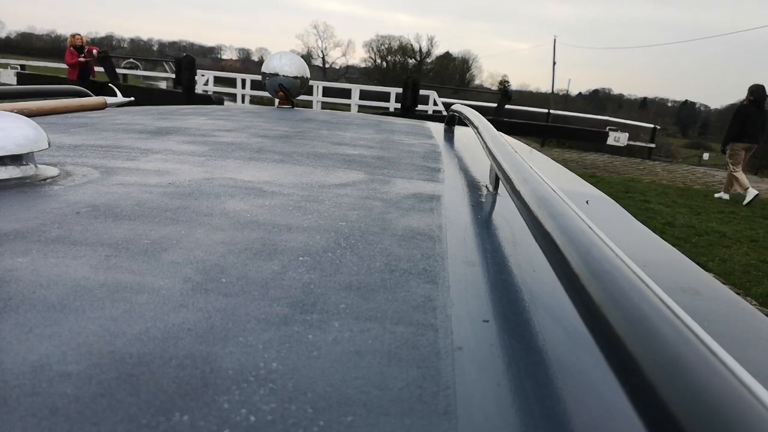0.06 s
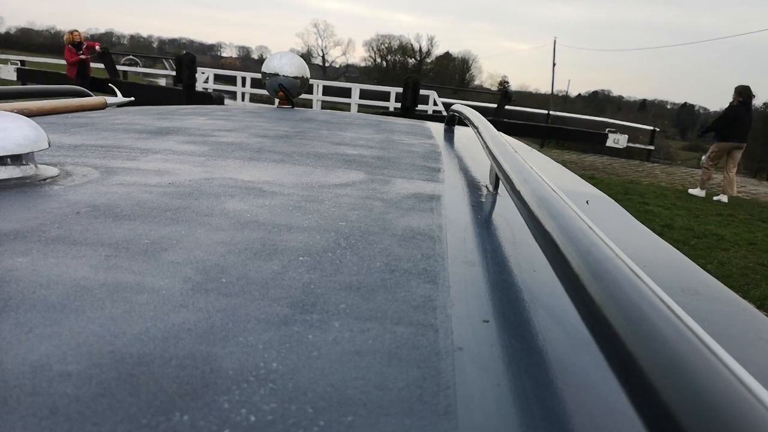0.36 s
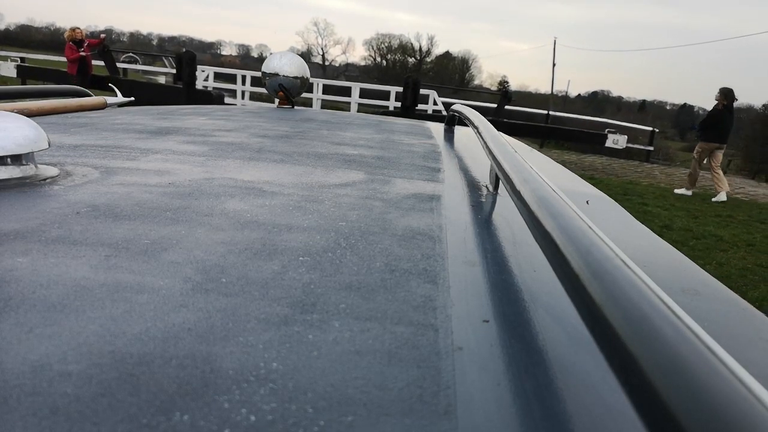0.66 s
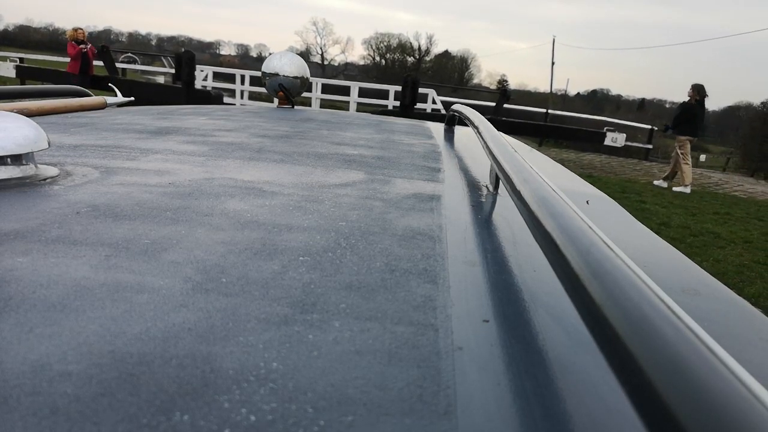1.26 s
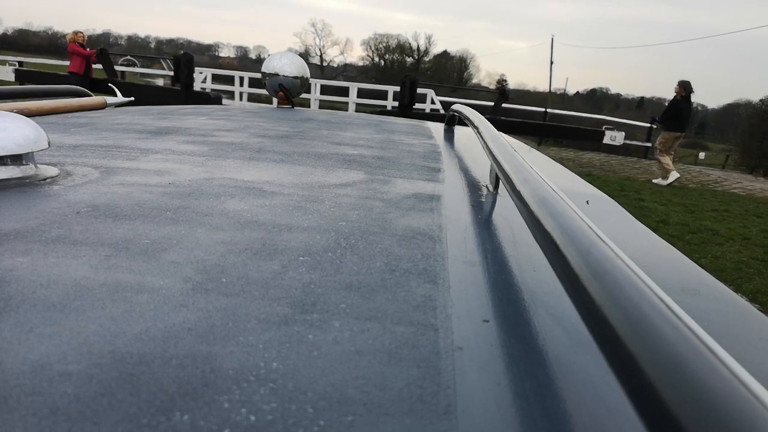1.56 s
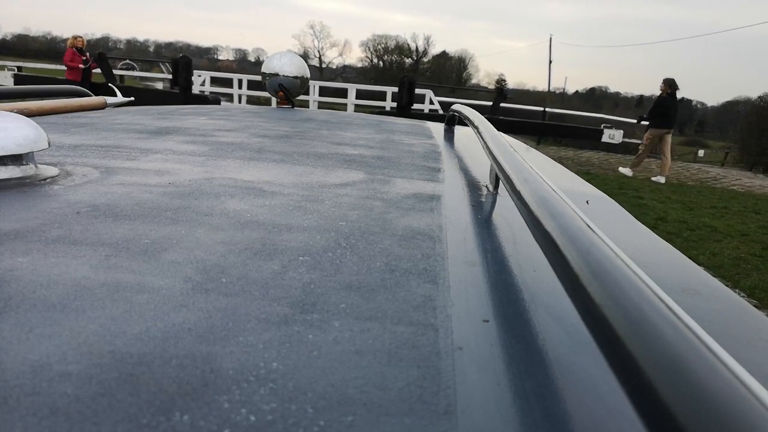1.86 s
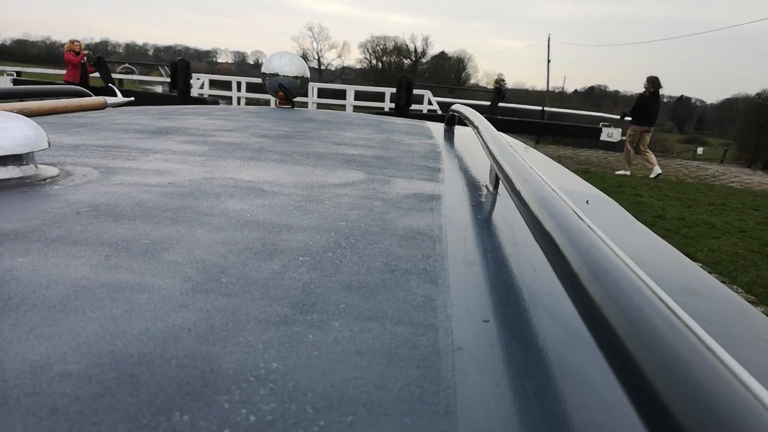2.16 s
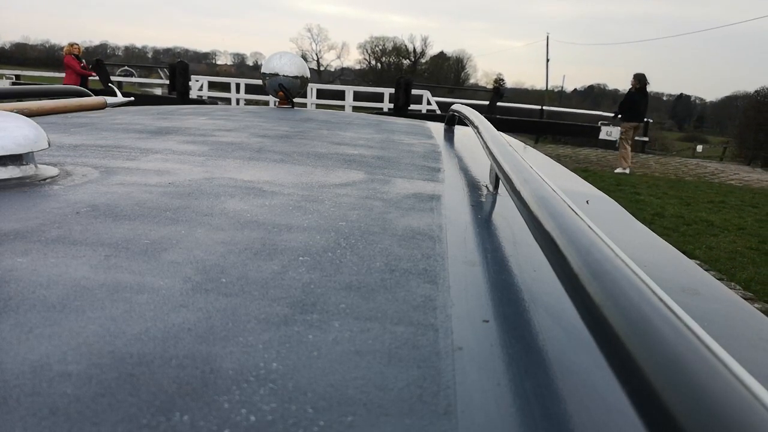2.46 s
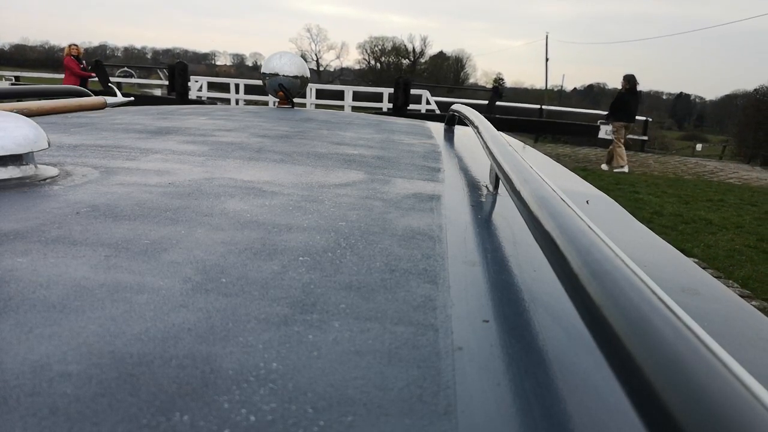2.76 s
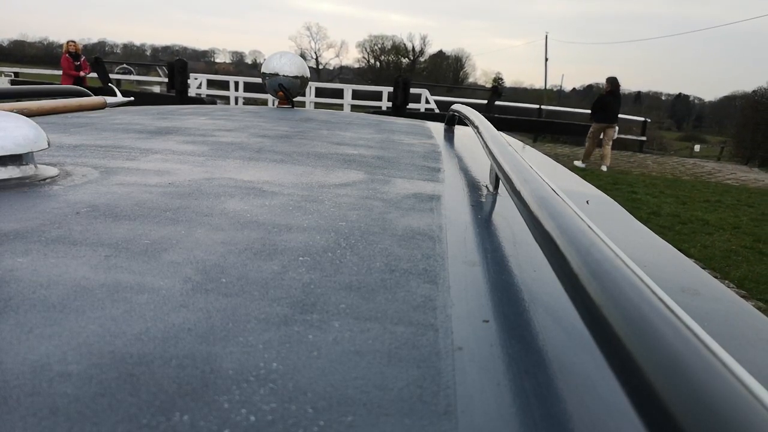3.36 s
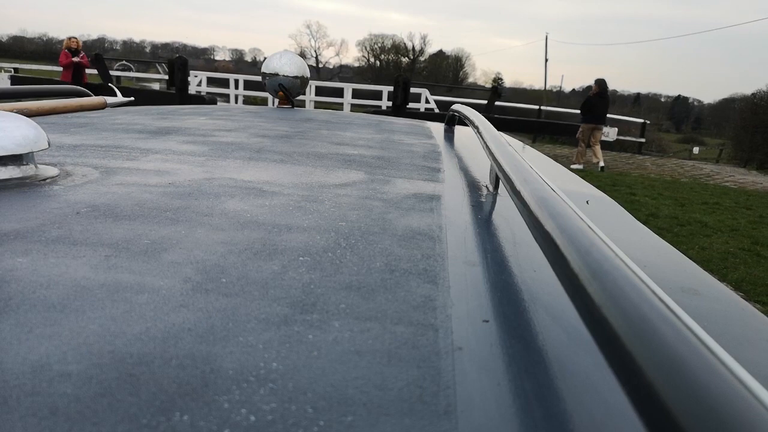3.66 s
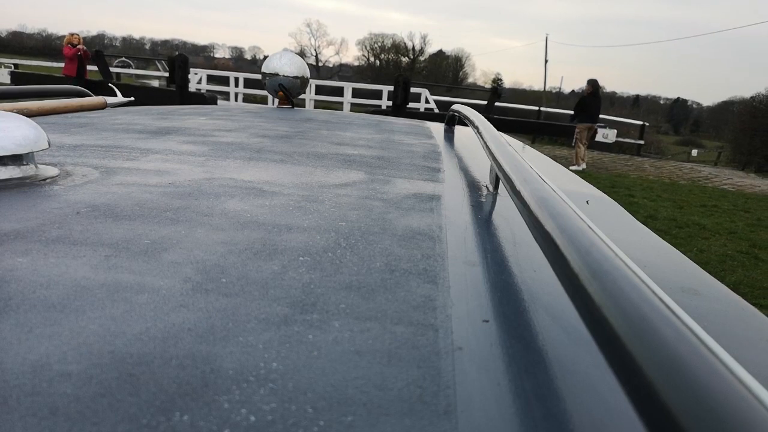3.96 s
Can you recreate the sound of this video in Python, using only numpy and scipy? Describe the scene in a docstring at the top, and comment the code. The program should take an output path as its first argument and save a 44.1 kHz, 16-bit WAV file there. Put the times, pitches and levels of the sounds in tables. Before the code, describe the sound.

A diesel engine drones and rumbles at idle, heard from aboard a narrowboat at a canal lock. Over a faint hiss of spilling water, a steel ratchet on the left clacks hard once, then clinks more lightly a few times.

```python
"""A diesel idles under the steel roof of a narrowboat waiting at a canal lock; water spills at the gates.
The uneven firings force the hull to vibrate at harmonics of the engine cycle, over a low rumble.
Off to the left the paddle gear is wound: the steel pawl drops onto the ratchet, once hard and three
times lightly. Each impact clacks in the iron frame and excites the pawl's modes, which ring until
the next tooth damps them. The banks reflect the sound as dull echoes."""
import sys
import numpy as np
from scipy import signal
from scipy.fft import rfft, irfft
from scipy.io import wavfile

SR = 44100
rng = np.random.default_rng(int(sys.argv[2]) if len(sys.argv) > 2 else 0)


def wav_record(signal):
    """Record a signal, one row per channel, as 16-bit PCM in the file named by sys.argv[1]."""
    frames = np.transpose(np.atleast_2d(signal))
    bounded = np.clip(frames, -1, 1)
    # unit amplitude maps onto the largest positive 16-bit level
    quanta = np.round(bounded * 32767).astype(np.int16)
    wavfile.write(sys.argv[1], SR, quanta)


N = 176400
T = np.arange(N) / SR

# Pawl drops and rebounds: t/s, level/dB of knock, tick, low, middle and high ring, base ring time/s
DROPS = [(1.158, -22.5, -20.5, -49, -19, -29, 0.01), (1.162, -16, -15.5, -29.5, -26, -34, .015),
         (1.1633, -22.5, -18.5, -43, -39, -4.5, .0055), (1.169, -22.5, -18.5, -37, -41, -22, 0.015),
         (1.196, -31, -46, -42, -44, -38, .028), (1.226, -31, -38, -48, -57, -42, .01),
         (1.233, -29.5, -38, -39, -40, -37, 0.019), (1.8055, -24.5, -24.5, -26.5, -29.5, -35, 0.033),
         (2.216, -29, -29, -28, -35, -46, 0.029), (2.716, -39, -60, -70, -70, -70, .01),
         (2.726, -30.5, -41, -47, -51, -62, .008), (2.7298, -26.5, -29.5, -24.5, -29, -34.5, 0.038),
         (2.756, -37, -45, -60, -60, -39, .012)]
RIGHT_LAG_S = .000187


def ratchet():
    """Impact excitation: each drop clacks and rings, reaching the left ear before the right."""
    lead, length = 512, 16384  # samples
    t = (np.arange(length) - lead) / SR
    since_arrival = t - np.array([[0], [RIGHT_LAG_S]])
    out = np.zeros((2, N + SR))
    for s, knock_db, tick_db, *ring_db, ring_s in DROPS:
        start = int(s * SR) - lead
        iron = clack(t, knock_db, tick_db) + from_db(knock_db) * frame(since_arrival)
        out[:, start:start + length] += iron + pawl(since_arrival, ring_db, ring_s)
    return (out + echoes(out))[:, :N]


# Pawl modes: f/Hz, relative level/dB, factor on the ring time, right minus left level/dB
PAWL_MODES = [(4279, 0, 1, -2), (4568, -19, 1, -2), (3790, -11, .45, -2), (7168, 0, 1.35, -11),
              (8205, 0, 1.15, -12), (11250, -30, 1.5, -3), (12660, -37, 1.6, -8), (13060, -28, 1.1, -10),
              (14760, -33, 1.9, -10)]
# Pitches that take a drop's low, middle, high, middle and high ring level: f/Hz
RING_PITCHES = [4280, 7170, 8200, 11250, 14760]
FREE_T60_S, DAMPING_POWER, RING_RISE_S = 0.52, 2.1, 0.0028


def pawl(t, ring_db, ring_s):
    """Contact damping: the modes ring freely, then die ever faster as the pawl meets the next tooth."""
    low, middle, high = ring_db
    ring = 0
    for hz, db, longer, right_db in PAWL_MODES:
        level_db = db + np.interp(hz, RING_PITCHES, [low, middle, high, middle, high])
        damping = np.exp(-(np.maximum(t, 0) / (ring_s * longer)) ** DAMPING_POWER)
        ring += from_db([[level_db], [level_db + right_db]]) * damping * sine(t, hz)
    return ring * rise(t, RING_RISE_S) * decay(t, FREE_T60_S)


# Spectrum of the clack: f/Hz, left level/dB, right level/dB (relative)
CLACK_SPECTRUM = [(255, -15, -26.5), (780, -5, -16), (1240, -4, -6), (2640, 5.5, 0.5), (3150, -3, -11.5),
                  (3830, 1, -0.5), (4770, -7, -11), (6500, -3, -18.5), (8500, 1, -27), (9400, -25, -13),
                  (9900, -33, -6), (11700, -49, -43), (15000, -62, -61)]
CROSSOVER_HZ, CLACK_RISE_S = 3300, 0.00029
SLIP_S, SLIP_DB = 0.0038, -10.5
TAIL_DB, TAIL_CUT_HZ, LUMP_S, LUMP_DB = -12.5, 7000, .0024, 8.5


def clack(t, knock_db, tick_db):
    """A brief impact is broadband: a low knock and a shorter high tick, then a dull scattered tail."""
    hz = np.arange(len(t) // 2 + 1) * SR / len(t)
    delay = np.exp(-2j * np.pi * hz * np.array([[0], [RIGHT_LAG_S]]))
    colour = delay * from_db(at_hz(CLACK_SPECTRUM, hz))
    colour /= irfft(colour).std()
    direct, scattered = (np.exp(2j * np.pi * rng.random(len(hz))) * colour for _ in range(2))
    low = 1 / (1 + (hz / CROSSOVER_HZ) ** 8)
    knock, tick = from_db(knock_db) * low, from_db(tick_db) * (1 - low)
    blow = irfft(direct * knock) * decay(t, t60=0.021) + irfft(direct * tick) * decay(t, t60=0.015)
    # the pawl scrapes off the tooth just before it lands
    slip = from_db(SLIP_DB) * rise(t + SLIP_S, SLIP_S) * (t < CLACK_RISE_S)
    lumps_db = np.interp(t, np.arange(-20, 400) * LUMP_S, rng.uniform(-LUMP_DB, LUMP_DB, 420))
    onset = rise(t, CLACK_RISE_S)
    tail = from_db(TAIL_DB + lumps_db) * onset * decay(t, t60=0.23)
    dull = irfft(scattered * (knock + tick) / (1 + (hz / TAIL_CUT_HZ) ** 4))
    return blow * onset + dull * (slip + tail)


# Modes of the iron frame: f/Hz, level/dB relative to the knock, T60/s
FRAME_MODES = [(513, -23, .28), (1116, -15.5, .12), (1170, -17, .1), (1590, -15.5, .11), (1825, -21, .14),
               (2650, -19, .16), (2906, -20, .18)]


def frame(t):
    """Free vibration: the struck frame rings as a sum of exponentially damped modes."""
    ring = 0
    for hz, db, t60 in FRAME_MODES:
        sides_db = at_hz(CLACK_SPECTRUM, hz)[:, None]
        ring += from_db(db + sides_db - sides_db[0]) * decay(t, t60) * sine(t, hz)
    return ring * rise(t, RING_RISE_S)


# Echo paths: delay t/s, level/dB
ECHOES = [(.063, -18.5), (.082, -27.5), (.108, -33)]


def echoes(sound):
    """Reflection: the banks and gates return delayed, weaker and duller copies."""
    dull = signal.sosfilt(signal.butter(2, 5300, fs=SR, output="sos"), sound)
    return sum(from_db(db) * np.roll(dull, int(s * SR), axis=1) for s, db in ECHOES)


# Engine speed: t/s, working cycle rate f/Hz
CYCLE_RATE = [(0, 7.527), (2.5, 7.54), (2.8, 7.5)]
# Four firings, two sharp and two dull, set the phases: share of the cycle, level/dB, bandwidth f/Hz
CYLINDERS = [(0, 0.5, 197.7), (0.238, 1, 200), (0.58, 6, 46.6), (0.822, -8.5, 48)]
# Hull drone: order (multiple of the cycle rate), relative level/dB
HULL_ORDERS = [(2, -34.5), (3, -3.5), (4, 1), (5, -12.5), (6, -16), (7, -4), (8, -2.5), (9, -9),
               (10, -19.5), (12, -36.5), (13, -22.5), (14, -24), (16, -35), (17, -29), (20, -36),
               (22, -28.5), (23, -37.5), (24, -29), (25, -34.5), (28, -37.5), (30, -33.5), (33, -35.5),
               (36, -36.5), (41, -42)]
DRONE_DB, DRONE_WIDTH, FIRING_AT_S = -26.5, 0.28, 3.1665
WOBBLE, WOBBLE_HZ, LOOSENESS, SCATTER_HZ = 0.42, 151, 0.4, 157


def engine():
    """Forced vibration: the hull's low orders keep step with the firings; high ones scatter and wobble."""
    rate = in_time(CYCLE_RATE)
    cycles = np.cumsum(rate) / SR
    cycles -= np.interp(FIRING_AT_S, T, cycles)
    share, firing_db, bandwidth_hz = np.transpose(CYLINDERS)
    out = np.zeros((2, N))
    for order in range(2, 42):
        hz = order * rate.mean()
        pushes = from_db(firing_db) * np.exp(-(hz / bandwidth_hz) ** 2 - 2j * np.pi * order * share)
        scatter = min((hz / SCATTER_HZ) ** 4, 2) * (rng.normal() + LOOSENESS * drift(2.83))
        spread = DRONE_WIDTH * min(hz / SCATTER_HZ, 2) * rng.normal(size=(2, 1))
        phase = 2 * np.pi * order * cycles + np.angle(pushes.sum()) + scatter + spread
        wobble = 1 + WOBBLE * min(hz / WOBBLE_HZ, 1) * drift(2.03)
        out += from_db(np.interp(order, *np.transpose(HULL_ORDERS))) * wobble * np.cos(phase)
    return np.sqrt(2) * from_db(DRONE_DB) * out


# Spectrum of the rumble: f/Hz, left level/dB, right level/dB (relative)
RUMBLE_SPECTRUM = [(14.9, -32, -65.5), (40.3, -6, -10.5), (80.6, 10.5, 10.5), (110, 5.5, 2),
                   (174, -15.5, -12.5), (268, -19, -20.5), (375, -24.5, -29), (800, -66, -63)]
# Envelope of the opening bump and the rumble: t/s, level/dB
RUMBLE_LEVEL = [(0, -26), (.3, -32), (.55, -39.5), (1.1, -35.5), (1.5, -39.5), (4, -38.5)]


def rumble():
    """Low-frequency noise: an abrupt low bump as the sound begins, then a nearly steady rumble."""
    return from_db(in_time(RUMBLE_LEVEL)) * diffuse_noise(RUMBLE_SPECTRUM)


# Spectrum of the water and, in the top rows, the hiss: f/Hz, left level/dB, right level/dB (relative)
WATER_HISS_SPECTRUM = [(100, -17.5, -12.5), (348, 8, 7), (500, 3.5, 2.5), (770, 3, 0), (1800, -4, -2),
                       (2655, 0, -9.5), (3350, -10, -9.5), (4340, -13, -15), (5700, -10, -14.5),
                       (6270, -16.5, -17), (7660, -6, -18), (8480, -15.5, -21), (9050, -19, -16.5),
                       (11400, -36, -32.5), (15500, -23, -30)]
# Envelope of water and hiss: t/s, level/dB
WATER_HISS_LEVEL = [(0, -54), (.8, -51.5), (4, -52.5)]


def water_and_hiss():
    """Modulated noise: a flickering rush of water at the gates, with steady microphone hiss above it."""
    return from_db(in_time(WATER_HISS_LEVEL)) * diffuse_noise(WATER_HISS_SPECTRUM, flicker_db=1.2)


# Likeness of left and right: f/Hz, correlation (-1 to 1)
CORRELATION = [(60, 0.93), (190, 0.88), (340, 0.26), (600, -0.49), (1060, 0.051), (1890, 0.4),
               (10000, -0.08)]


def diffuse_noise(spectrum, flicker_db=0):
    """A diffuse field is partly correlated between the ears; rms 1. Lower octaves may flicker singly."""
    hz = np.arange(N // 2 + 1) * SR / N
    alike = at_hz(CORRELATION, hz)[0]
    mid, side = rfft(rng.standard_normal((2, N)))
    both = np.sqrt(1 + alike) * mid + np.sqrt(1 - alike) * side * [[1], [-1]]
    both *= from_db(at_hz(spectrum, hz))
    if not flicker_db:
        return unit_rms(irfft(both, N))
    octave = np.clip(np.log2(hz / 250 + 1e-9), 0, 6)
    out = 0
    for k in range(7):
        band = irfft(both * np.maximum(1 - abs(octave - k), 0), N)
        out += band * from_db(flicker_db * (k < 6) * drift(rate_hz=17))
    return unit_rms(out)


def drift(rate_hz):
    """Low-passed noise wanders slowly, with rms 1."""
    step, settle = 40, 2000
    pole = np.exp(-2 * np.pi * rate_hz * step / SR)
    white = rng.standard_normal(N // step + settle + 2)
    slow = signal.lfilter([1], [1, -2 * pole, pole * pole], white)[settle:]
    return np.interp(np.arange(N) / step, np.arange(len(slow)), unit_rms(slow))


def sine(t, hz):
    """Simple harmonic motion with a random phase."""
    return np.sin(2 * np.pi * (hz * t + rng.random()))


def decay(t, t60):
    """Exponential decay by 60 dB in t60 seconds."""
    return np.exp(-np.log(1000) * np.maximum(t, 0) / t60)


def rise(t, rise_s):
    """Linear onset from 0 to 1."""
    return np.clip(t / rise_s, 0, 1)


def from_db(db):
    """Level to amplitude ratio."""
    return 10 ** (np.asarray(db) / 20)


def unit_rms(x):
    """Normalisation to rms 1."""
    return x / np.sqrt(np.mean(x ** 2) + 1e-20)


def in_time(rows):
    """Linear interpolation at every sample."""
    return np.interp(T, *np.transpose(rows))


def at_hz(rows, hz):
    """Interpolation of each column over log frequency."""
    f, *columns = np.transpose(rows)
    return np.array([np.interp(np.log(hz + 1e-9), np.log(f), c) for c in columns])


def scene():
    """Superposition: engine and ratchet add to the rumble, water and hiss."""
    background = rumble() + water_and_hiss()
    return background + engine() + ratchet()


def record(dry):
    """Band limiting: a steep low-pass removes the treble above 15.6 kHz."""
    return signal.sosfilt(signal.cheby2(12, 70, 15600, fs=SR, output="sos"), dry)


dry = scene()
out = record(dry)
wav_record(out)
```